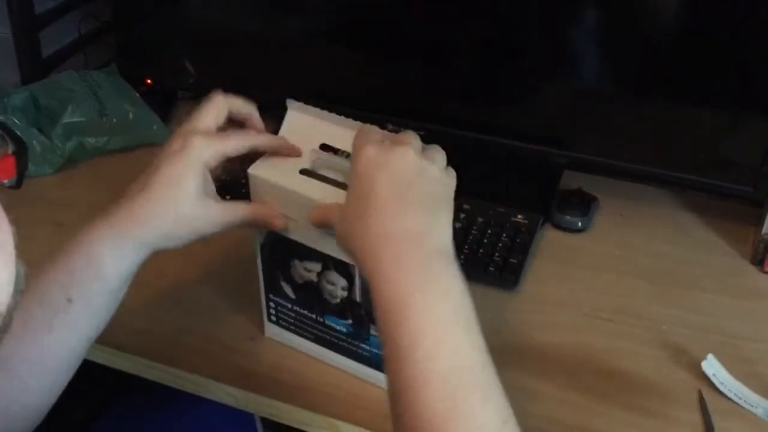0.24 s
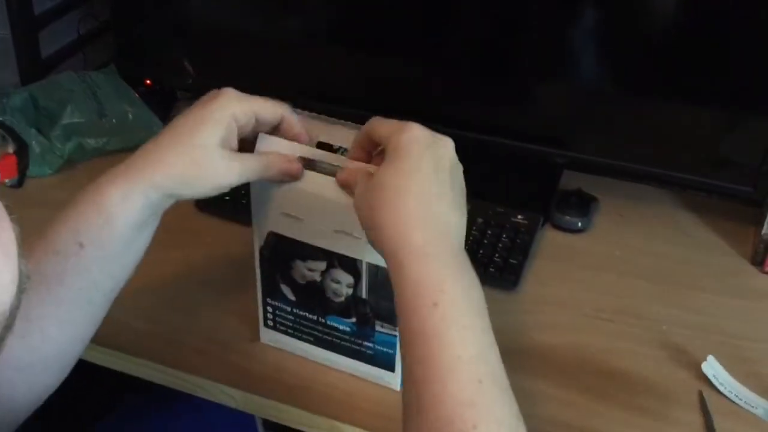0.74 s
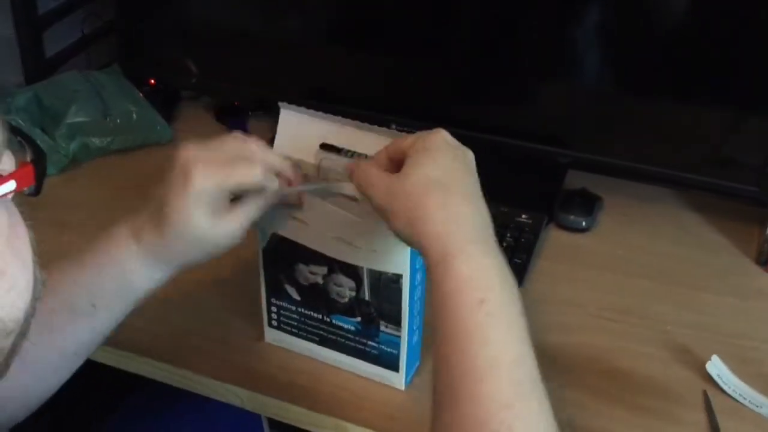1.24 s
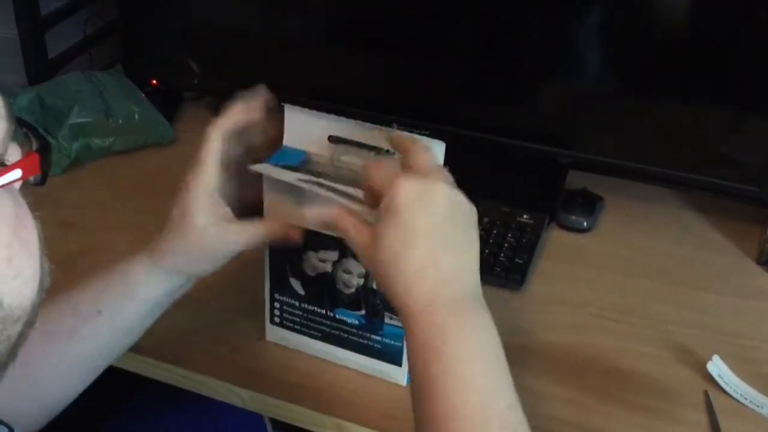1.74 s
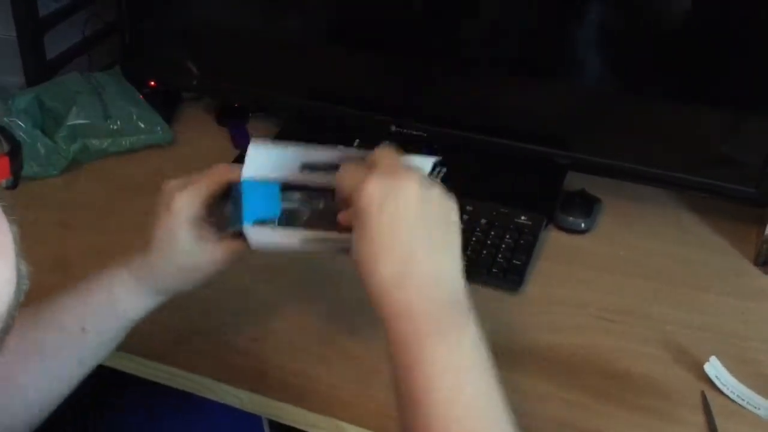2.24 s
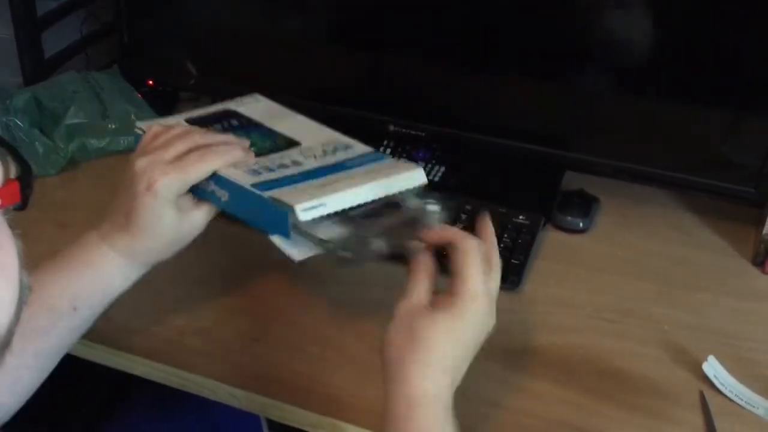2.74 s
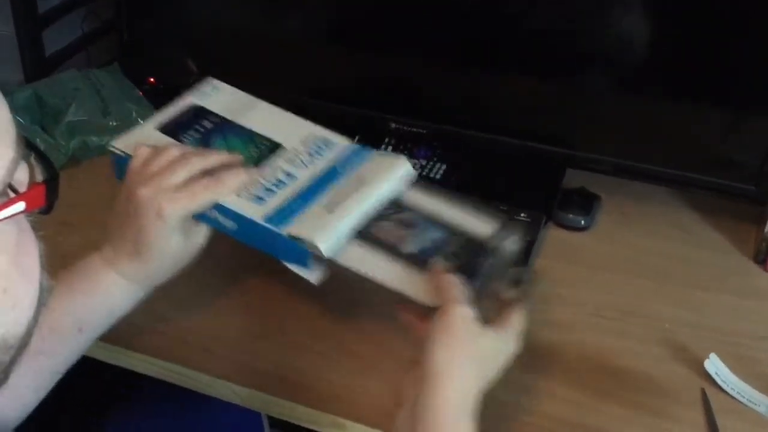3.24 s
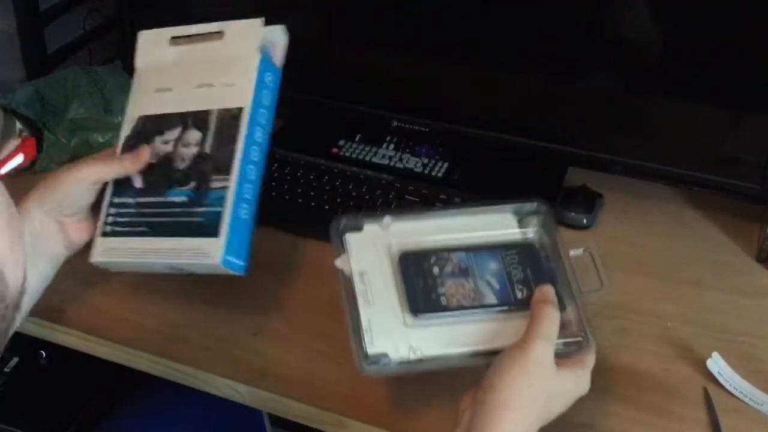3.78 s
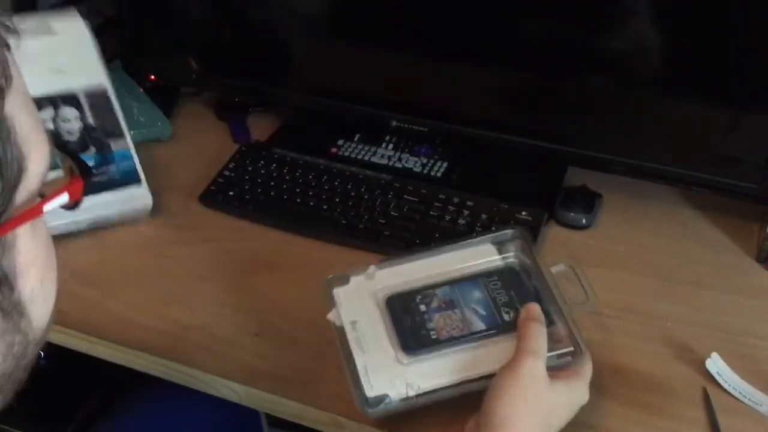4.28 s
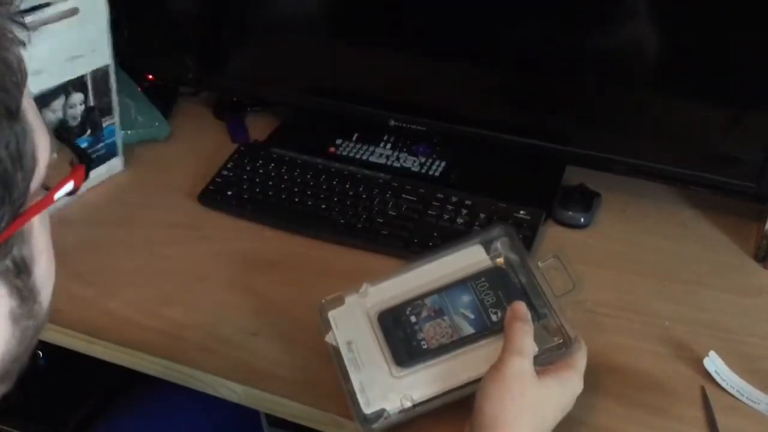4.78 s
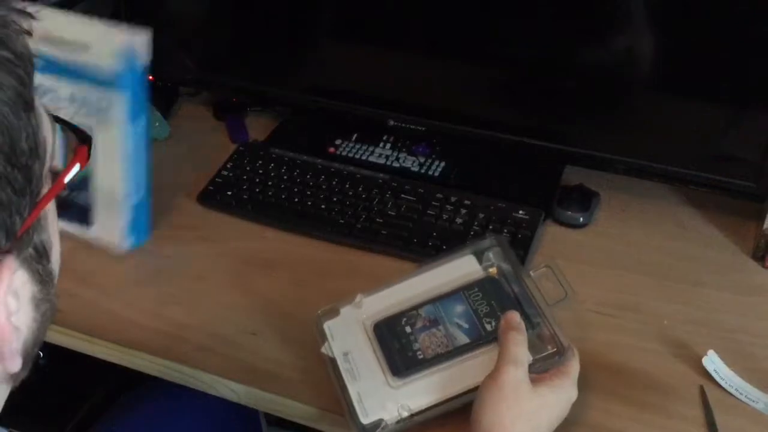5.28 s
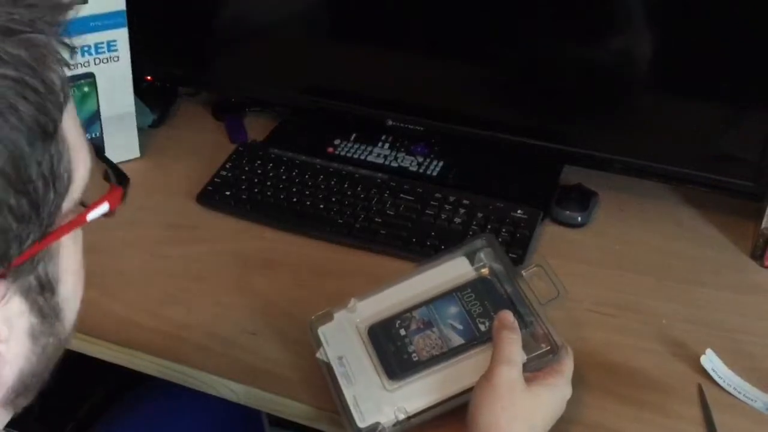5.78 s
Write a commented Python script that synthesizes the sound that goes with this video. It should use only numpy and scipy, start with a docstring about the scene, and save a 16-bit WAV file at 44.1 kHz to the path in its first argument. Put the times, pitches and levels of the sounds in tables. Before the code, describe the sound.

A small cardboard box is torn open, its flap pops free, a plastic tray scrapes out, and the box knocks down on a desk.

```python
"""Card rustles, snaps and creaks as a small box is torn open at a desk, and its flap pops free. A plastic tray
scrapes out in five short pulls. A hand brushes the empty box and plastic ticks; the box is knocked down on the
desk, rocks, and is turned round with a short bright swish. Rubbing is many tiny slips, a snap is a run of
breaking fibres, and a pop or knock sets the flap or desk ringing. Under it all lie the air of a small room and
the faint hum of a computer."""
import sys
import numpy as np
from scipy import signal
from scipy.fft import rfft, irfft, next_fast_len
from scipy.io import wavfile

SR = 44100
rng = np.random.default_rng(int(sys.argv[2]) if len(sys.argv) > 2 else 0)


def wrap_up_sound(samples):
    """Save the sound to the file named by the first command line argument, as 16-bit audio."""
    columns = np.atleast_2d(samples).T
    # keep every value between -1 and 1, then stretch to whole-number steps
    tamed = np.clip(columns, -1, 1)
    steps = np.round(tamed * 32767).astype(np.int16)
    wavfile.write(sys.argv[1], SR, steps)


N = 265482

# Rubbing strokes. Each row: start and hold in seconds, level in dB, then wall rumble and fibre hiss
# in dB above that level. Each kind of rub adds its own balance on top.
CARD_GRIPS = [(0.127, 0.093, -39, -6.5, -13.5), (0.273, 0.15, -47.5, 5.5, -7.5),
              (0.474, .25, -46.5, -13, -10), (0.785, .11, -45, -1.5, -10), (0.97, 0.091, -41, -12, -17),
              (1.076, 0.13, -43, -7, -13.5), (1.233, 0.066, -46, -12, -14), (1.293, 0.043, -40, -3.5, -15),
              (1.388, 0.062, -40, -6, -17.5), (1.49, 0.026, -35, -6, -15.5), (1.58, 0.046, -47, -4, -15.5),
              (1.669, 0.074, -47.5, 0, -8), (1.836, 0.026, -44, 3.5, -11), (1.915, 0.1, -41.5, 5, -10),
              (2.051, 0.064, -39.5, -3, -13), (2.221, 0.053, -52.5, 4, -11.5)]  # fingers work the card
TRAY_PULLS = [(2.35, 0.11, -39.5, -10, -9.5), (2.51, 0.046, -29.5, -16, -10.5),
              (2.77, 0.081, -34.5, -10, -7.5), (2.98, 0.066, -37, -6.5, -17), (3.235, 0.094, -35, -11, -6)]  # the tray moves in its sleeve
HAND_BRUSHES = [(3.397, 0.1, -47.5, 0.5, -18), (3.598, 0.11, -50.5, -3, -14.5),
                (3.922, 0.043, -55.5, 0, -7.5), (4.861, .13, -46, -0.5, -5), (5.15, 0.013, -57.5, 12, -4),
                (5.33, 0.08, -43.5, 1.5, -1.5), (5.445, 0.068, -37.5, -2, -6.5), (5.68, 0.21, -57, 5.5, -9)]  # a hand passes over the empty box
DESK_SCUFF = [(4.232, 0.3, -46, 2.6, -4)]  # the box scuffs the desk as it lands
# The box swivels and skids. Each row: start in seconds, hold in seconds, level in dB.
BOX_TURNS = [(5.32, 0.11, -37), (5.357, 0.055, -25.5)]
# Card gives way and tray edges catch. Each row: start in seconds, relative level in dB,
# brightness in dB, crumbling time in seconds.
CARD_SNAPS = [(0.225, -40, -14, 0.0022), (0.257, -33, -8.5, 0.014), (.291, -27, -3, 0.0019),
              (0.346, -44, -6, 0.0015), (.36, -35, -7.5, .006), (0.385, -31.5, -1.5, 0.0016),
              (0.484, -40.5, 11, 0.0023), (.501, -44, -14, .002), (0.545, -36.5, 9, 0.0042),
              (0.676, -36.5, 3, .008), (0.703, -29.5, 1.5, 0.0035), (.797, -24.5, -2.5, 0.0065),
              (.803, -22, 5, 0.0063), (.821, -25.5, -1, 0.0065), (.861, -26, -3, 0.0029),
              (.866, -22, 5, 0.0058), (0.945, -30.5, 4, 0.0028), (1, -35.5, -4, 0.0023),
              (1.271, -33, 1, 0.015), (1.306, -20, 10.5, 0.01), (1.393, -37, 0, 0.0044),
              (1.446, -35.5, 4, .005), (1.497, -22.5, 3, 0.0072), (1.512, -41, 2, 0.007),
              (1.56, -34.5, -3, .005), (1.721, -39.5, -8.5, .004), (1.752, -49.5, 12, .003),
              (1.784, -34, -1, 0.015), (1.893, -32.5, 4, 0.015), (1.922, -28, -4, 0.0032),
              (1.968, -26.5, -1.5, 0.0022), (1.999, -29, -6.5, .006), (2.245, -36.5, -1, 0.0026),
              (2.311, -32.5, 5.5, 0.01), (2.398, -32.5, -0.5, .004), (2.822, -43, -14, 0.0097),
              (2.952, -36.5, 6, 0.011), (2.975, -45, 18.5, 0.012), (2.99, -30.5, 1.5, 0.011),
              (3.126, -35.5, 1.5, 0.02), (3.194, -35.5, -1.5, .002), (3.27, -33.5, -9.5, .007),
              (3.335, -24, 3, .008), (3.342, -32.5, 11, 0.013), (3.692, -43, 0, 0.0038),
              (3.883, -41, 2.5, 0.0059), (4.231, -26, -10, 0.011), (4.244, -26, -4, 0.016),
              (4.336, -31, 7.5, 0.015), (4.439, -42, 16, 0.0052), (5.011, -37, 9.5, 0.0058)]
# Card rasps on card and plastic. Each row: start and length in seconds, level in dB, pitch in Hz.
CARD_CREAKS = [(1.02, 0.015, -36.5, 1130), (1.026, .03, -33, 1150), (1.131, 0.082, -40.5, 1170),
               (1.38, 0.056, -40, 1350), (1.898, 0.025, -41, 970), (2.412, 0.029, -37.5, 960),
               (2.998, 0.04, -43.5, 1410), (3.021, 0.038, -44.5, 1690), (3.031, 0.034, -46.5, 2080),
               (3.728, 0.046, -50.5, 850), (4.775, .025, -49, 820), (4.91, .025, -46, 950),
               (5.467, 0.017, -36.5, 2980)]
# Dry plastic ticks. Each row: start in seconds, level in dB, pitch in Hz.
PLASTIC_TICKS = [(3.562, -60, 6240), (4.577, -54, 6200), (4.596, -50.5, 3580), (5.562, -48, 3850),
                 (5.709, -56.5, 2820), (5.835, -56, 4300), (5.857, -55, 2740), (5.925, -49, 1690)]
# Sudden blows. Each row: start in seconds, relative level in dB, treble cut-off in Hz.
FLAP_POPS = [(1.4945, -15.5, 600), (1.4972, 0.5, 1280), (1.5605, -26, 1200)]
DESK_KNOCKS = [(4.2295, -6, 2460), (4.2368, -7, 900), (4.2442, -6, 910), (5.013, -34.5, 900),
               (5.243, -33.5, 700)]
# Ringing tones of struck things. Each row: pitch in Hz, relative level in dB, seconds to fade by 60 dB.
FLAP_TONES = [(54.6, -25, 0.1), (112, -30, 0.44), (260, -5.5, 0.043), (317, -23.5, 0.3),
              (371.7, -1.5, 0.064), (544, -8, 0.031), (662, -11, 0.045), (1168, -25, 0.094),
              (1550, -18, .05)]
DESK_TONES = [(98.6, -34, 0.78), (115.4, 3.5, 0.067), (206.5, -6, 0.16), (297.5, -23, 0.69),
              (406, -10, 0.13), (464.3, -18.5, 0.24), (655, -31, 0.19), (698, -14, 0.054), (727, -14, 0.12),
              (1013, -23.5, 0.22), (1290, -34, 0.14), (1887, -28, .06), (2440, -35, 0.11)]  # the desk top with the box on it
# Resonances, the pitches the box favours. Each row: pitch in Hz, width in Hz, gain in dB.
WALL_RINGS = [(114, 56, -1), (197, 83, -4), (345, 65, 10.5), (469, 31, 2)]
PANEL_RINGS = [(574, 124, 2.5), (780, 228, 6), (858, 237, 6.5), (1167, 185, 4), (1566, 520, -4),
               (1870, 260, -4)]
SKID_RINGS = [(3410, 83, 5), (4100, 160, 10), (5150, 220, -19), (6450, 50, 0), (8045, 40, -15)]
# The tone colour of each noise. Each row: frequency in Hz, relative level in dB.
CARD_COLOUR = [(15, -51), (25, -2), (45, -3.5), (82, -13), (117, -17.5), (256, -12.5), (317, -3.5),
               (451, -14.5), (641, -9.5), (887, -15), (1160, -9.5), (2760, -26), (5430, -31.5),
               (11900, -39), (16000, -43)]
TRAY_COLOUR = [(15, -41), (25, -13), (39, -14.5), (157, -14.5), (270, -10.5), (394, -1), (775, -6),
               (840, -6), (1070, -5.5), (1190, -3), (2550, -20), (5430, -25.5), (7310, -30.5), (11900, -33),
               (16000, -40)]
SKIN_COLOUR = [(15, -38), (25, 17.5), (117, 10), (256, 2), (416, -5.5), (516, -5), (695, -0.5), (840, -1),
               (2550, -11.5), (2840, -11.5), (5570, -22), (13600, -22), (16000, -24)]
GLOSS_COLOUR = [(1060, -28), (1800, -14), (2120, -13), (2280, -6.5), (3320, 0), (4530, -4), (5200, 2),
                (7160, -2), (10100, -10), (15100, -9), (16000, -29)]
AIR_COLOUR = [(15, -28), (25, 7), (41, -2), (70, -6.5), (92, -22), (212, -7.5), (249, -25), (285, -5),
              (326, -10.5), (439, -13), (1040, -19.5), (1440, -23), (1840, -27), (2990, -38), (16000, -46)]


def from_db(db):
    """Turn decibels into a gain."""
    return 10 ** (np.asarray(db) / 20)


def unit_level(x):
    """Scale a sound so its average power is 1."""
    return x / np.sqrt(np.mean(x ** 2) + 1e-20)


def cut(x, hz, kind, order=2):
    """Keep the low part, the high part or one band of a sound."""
    return signal.sosfilt(signal.butter(order, np.clip(hz, 10, .45 * SR), kind, fs=SR, output="sos"), x)


def add(out, start, sound):
    """Mix in a short sound at a time in seconds."""
    at = int(start * SR)
    out[at:at + len(sound)] += sound[:N - at]


def coloured(x, colour):
    """Give a steady noise a tone colour."""
    hz, db = np.transpose(colour)
    size = next_fast_len(N)
    bins = np.maximum(np.arange(size // 2 + 1) * SR / size, 1)
    gain = from_db(np.interp(np.log(bins), np.log(hz), db))
    return irfft(rfft(x, size) * gain, size)[:N]


def drift(per_s):
    """Glide to a new random value so many times a second."""
    points = rng.standard_normal(4096)
    return np.interp(np.arange(N) / SR * per_s, np.arange(len(points)), points)


def resonate(x, rings):
    """Let a sound ring in several resonances, added with alternating signs."""
    out = 0
    for k, (hz, width, db) in enumerate(rings):
        r = np.exp(-np.pi * width / SR)
        ring = signal.lfilter([1, 0, -1], [1, -2 * r * np.cos(2 * np.pi * hz / SR), r * r], x)
        out = out + (-1) ** k * from_db(db) * (1 - r * r) / 2 * ring
    return out


def background(hum_hz=123, hum_db=-61, air_db=-52):
    """A computer hums, wavering a little, over the steady room air."""
    tone = np.sqrt(2) * np.sin(2 * np.pi * hum_hz * np.arange(N) / SR)
    hum = from_db(hum_db + 1.5 * drift(2.9)) * tone
    return hum + from_db(air_db) * unit_level(coloured(rng.standard_normal(N), AIR_COLOUR))


def strokes(rows, attack_s, release_s):
    """Each stroke swells, holds and dies away; gives one loudness curve per dB column."""
    t, power = np.arange(N) / SR, 0
    for start, hold_s, db, *above_db in rows:
        fade = np.maximum(start - t, 0) / attack_s + np.maximum(t - start - hold_s, 0) / release_s
        effort = np.exp(-np.minimum(fade, 30))
        gains = from_db(db + np.array([0, *above_db]))
        power = power + (gains[:, None] * effort) ** 2
    return np.sqrt(power)


def slips(size, per_s, spread_db):
    """Surfaces stick and let go, making tiny clicks of random timing and strength."""
    happens = rng.random(size) < per_s / SR
    strength = from_db(spread_db * np.minimum(rng.exponential(1, size), 4))
    return unit_level(happens * strength * rng.choice([-1, 1], size))


def shifting(x, low_hz, high_hz, shift_db, count=10):
    """Bands of a rub rise and fall on their own as the contact moves."""
    edges = np.geomspace(low_hz, high_hz, count + 1)
    bands = [(-1) ** k * cut(x, edges[k:k + 2], "band") for k in range(count)]
    return unit_level(sum(band * from_db(shift_db * drift(25)) for band in bands))


def wall_echo(x, delay_ms=.168, wander_ms=.012, echo_db=-12):
    """An echo off the nearest box wall colours the hiss; its path changes as the hands move."""
    n = np.arange(N)
    lag = (delay_ms + wander_ms * drift(9)) * SR / 1000
    return unit_level(x + from_db(echo_db) * np.interp(n - lag, n, x))


def friction(levels, colour, per_s, spread_db, smooth_db, judder_db, rumble_db, body_db, hiss_db):
    """Slips over a smooth rub shake the walls, ring the panels and hiss; the grip judders."""
    grains = slips(N, per_s, spread_db) + from_db(smooth_db) * rng.standard_normal(N)
    rub = coloured(grains * from_db(judder_db * drift(70)), colour)
    walls = from_db(rumble_db) * unit_level(cut(rub, 230, "low", order=4))
    panels = from_db(body_db) * shifting(rub, 252.3, 2170, shift_db=3.5)
    fibres = from_db(hiss_db) * wall_echo(shifting(rub, 2300, 17000, shift_db=1.8))
    body, rumble, hiss = levels
    return rumble * walls + body * panels + hiss * fibres


def card_rustle():
    """Fingers grip and work the card in jerky rubs."""
    levels = strokes(CARD_GRIPS, attack_s=0.025, release_s=0.023)
    return friction(levels, CARD_COLOUR, per_s=1200, spread_db=3, smooth_db=0, judder_db=4,
                    rumble_db=3.5, body_db=2.5, hiss_db=1)


def small_snaps(db=-45, spread_db=1.5, brightness_db=-6, crumble_s=0.0046):
    """One weak snap falls somewhere in each grip; gives rows like CARD_SNAPS."""
    return [(start + hold_s * rng.random(), db + spread_db * rng.standard_normal(),
             brightness_db, crumble_s) for start, hold_s, *_ in CARD_GRIPS]


def snaps(thud_db=-13.5, panel_db=-11.5, crack_db=-29, rise_s=0.00034):
    """A run of breaking fibres thuds in the walls, rings in the panels and cracks in the treble."""
    out, t = np.zeros(N), np.arange(SR // 10) / SR
    for start, db, brightness_db, crumble_s in CARD_SNAPS + small_snaps():
        burst = slips(len(t), 9000, 3.75) * (1 - np.exp(-t / rise_s)) * np.exp(-t / crumble_s)
        thud = cut(resonate(burst, WALL_RINGS), 600, "low")
        ring = cut(resonate(burst, PANEL_RINGS), 2500, "low")
        crack = cut(cut(burst, 1400, "high"), 3300, "low", order=1)
        add(out, start, from_db(db - brightness_db + thud_db) * unit_level(thud))
        add(out, start, from_db(db + panel_db) * unit_level(ring))
        add(out, start, from_db(db + brightness_db + crack_db) * unit_level(crack))
    return out


def creaks(width_hz=150):
    """Quick slips keep one resonance of the card ringing."""
    out = np.zeros(N)
    for start, length_s, db, hz in CARD_CREAKS:
        swell = np.hanning(int(length_s * SR)) ** .5
        ringing = resonate(slips(SR // 4, per_s=1200, spread_db=0.3), [(hz, width_hz, 0)])
        add(out, start, from_db(db) * unit_level(ringing[-len(swell):] * swell))
    return out


def blows(contacts, tones, crack_db, crack_s, boom_db, boom_s, boom_hz):
    """Each blow rings every tone, cracks and leaves a low boom; a soft contact is duller."""
    out, t = np.zeros(N), np.arange(SR // 2) / SR
    ringing = sum(from_db(db - 60 * t / fade_s) * np.sin(2 * np.pi * hz * t) for hz, db, fade_s in tones)
    for start, db, cutoff_hz in contacts:
        crack = from_db(crack_db) * cut(rng.standard_normal(len(t)), 350, "high") * np.exp(-t / crack_s)
        # countless weak tones blur into a low noise
        blur = cut(cut(rng.standard_normal(len(t)), 70, "high", order=4), boom_hz, "low")
        boom = from_db(boom_db) * unit_level(blur) * np.exp(-t / boom_s)
        add(out, start, from_db(db) * cut(ringing + crack + boom, cutoff_hz, "low"))
    return out


def flap_pop():
    """The flap springs free and rings."""
    return blows(FLAP_POPS, FLAP_TONES, crack_db=-10, crack_s=0.014,
                 boom_db=-32, boom_s=0.036, boom_hz=450)


def tray_scrape():
    """The plastic tray rubs along its sleeve in fairly even slips."""
    levels = strokes(TRAY_PULLS, attack_s=0.043, release_s=0.044)
    return friction(levels, TRAY_COLOUR, per_s=1200, spread_db=0.5, smooth_db=0.5, judder_db=-1.5,
                    rumble_db=-0.5, body_db=-1.5, hiss_db=-4.5)


def brushing():
    """The hand rubs over the empty box, and the box scuffs over the desk."""
    hand = strokes(HAND_BRUSHES, attack_s=0.058, release_s=.05)
    scuff = strokes(DESK_SCUFF, attack_s=0.0091, release_s=0.14)
    return friction(np.hypot(hand, scuff), SKIN_COLOUR, per_s=1700, spread_db=8.5, smooth_db=8,
                    judder_db=2.5, rumble_db=-5, body_db=-0.5, hiss_db=-1.5)


def ticks(width_hz=650, click_db=-22, decay_s=0.0026):
    """Thin plastic clicks through one broad resonance that dies at once."""
    out, t = np.zeros(N), np.arange(SR // 100) / SR
    for start, db, hz in PLASTIC_TICKS:
        click = rng.standard_normal(len(t)) * np.exp(-t / decay_s)
        tick = resonate(click, [(hz, width_hz, 0)]) + from_db(click_db) * cut(click, 1000, "high")
        add(out, start, from_db(db) * unit_level(tick))
    return out


def desk_knocks():
    """The box lands on its edges and rocks, ringing the desk with no deep bass."""
    knocks = blows(DESK_KNOCKS + rocking(), DESK_TONES, crack_db=-23.5, crack_s=0.066,
                   boom_db=-12.5, boom_s=0.055, boom_hz=428)
    return cut(knocks, 84, "high", order=4)


def rocking(count=8, period_s=.058, jitter_s=0.00301, settle_s=0.066, dulling_s=0.24):
    """Contacts grow softer and duller, down to a wobble the hand keeps up; rows like DESK_KNOCKS."""
    first_db, wobble_db, first_hz, wobble_hz = -13, -32, 1900, 290
    age = period_s * np.arange(count)
    db = wobble_db + (first_db - wobble_db) * np.exp(-age / settle_s)
    cutoff_hz = wobble_hz + (first_hz - wobble_hz) * np.exp(-age / dulling_s)
    starts = 4.284 + age + jitter_s * rng.standard_normal(count)
    return list(zip(starts, db, cutoff_hz))


def swish(rings_db=-0.5):
    """Glossy card skids as the box turns: very dense slips with a few narrow rings."""
    skid = coloured(slips(N, per_s=14000, spread_db=2), GLOSS_COLOUR)
    level = strokes(BOX_TURNS, attack_s=0.009, release_s=0.014)[0]
    return level * unit_level(skid + from_db(rings_db) * resonate(skid, SKID_RINGS))


def room(x, fade_s, echo_db):
    """Add dense, slightly dull echoes from the desk and near walls."""
    t = np.arange(SR * 3 // 4) / SR
    noise = cut(rng.standard_normal(len(t)), 12700, "low", order=1)
    tail = noise * from_db(-60 * t / fade_s) * (t > .004)
    return x + from_db(echo_db) * signal.fftconvolve(x, tail / np.linalg.norm(tail))[:N]


def scene():
    """Mix everything in the room; the pop and knocks echo a little longer."""
    handling = card_rustle() + tray_scrape() + brushing() + snaps() + creaks() + ticks()
    thumps = flap_pop() + desk_knocks()
    light = room(handling + swish(), fade_s=0.2, echo_db=-14.5)
    heavy = room(thumps, fade_s=0.31, echo_db=-18)
    return (light + heavy + background())[None]


def record(dry):
    """Clip peaks at full scale and cut the treble above 16000 Hz."""
    return signal.sosfilt(signal.ellip(10, .1, 80, 16000, fs=SR, output="sos"), np.clip(dry, -1, 1))


dry = scene()
out = record(dry)
wrap_up_sound(out)
```